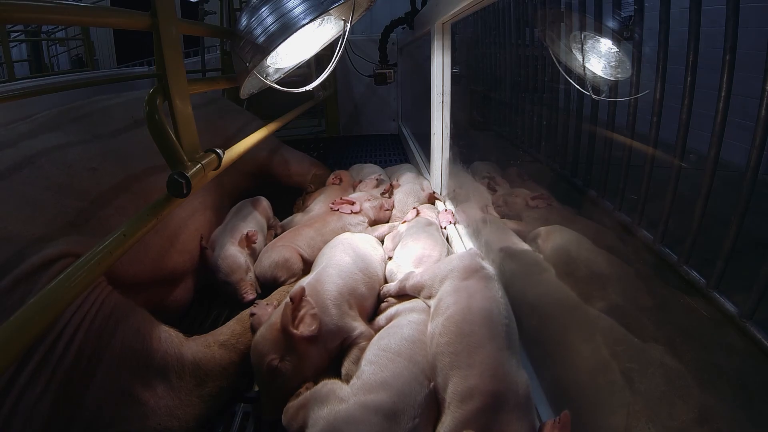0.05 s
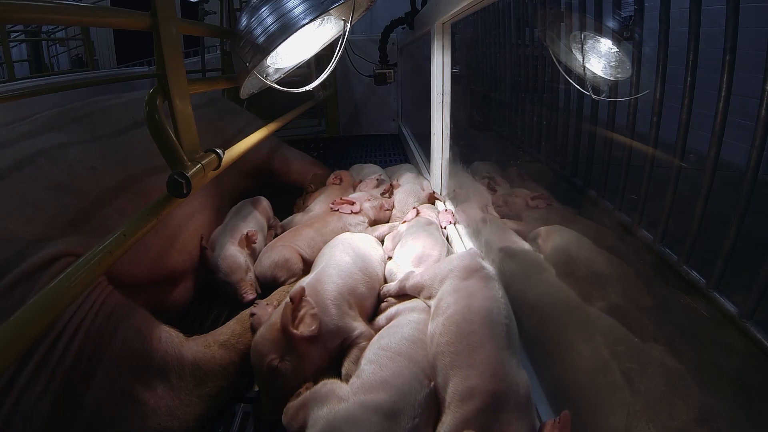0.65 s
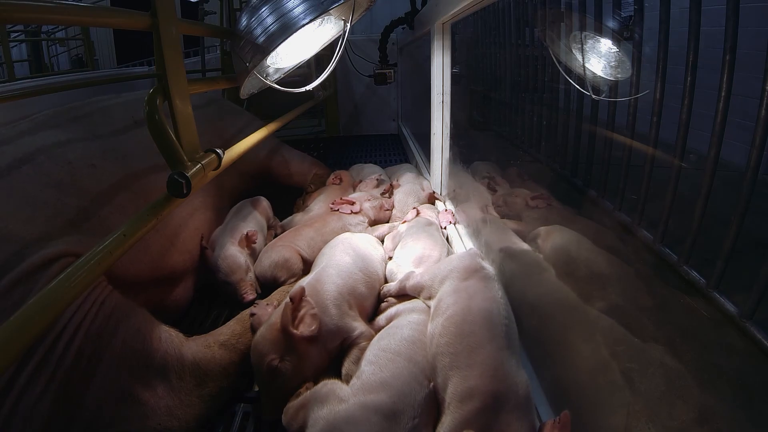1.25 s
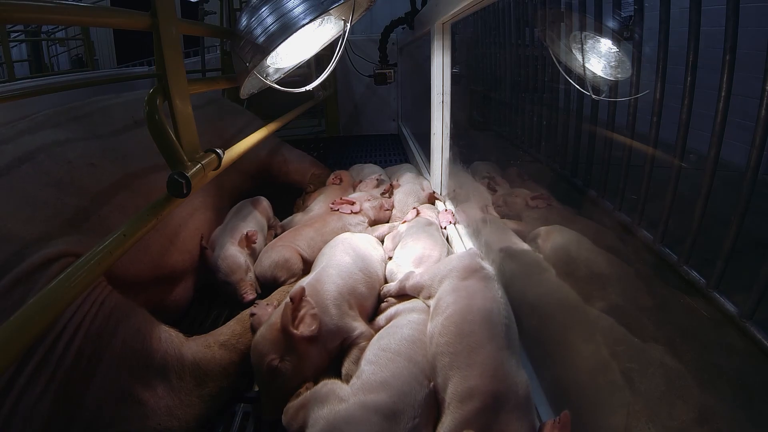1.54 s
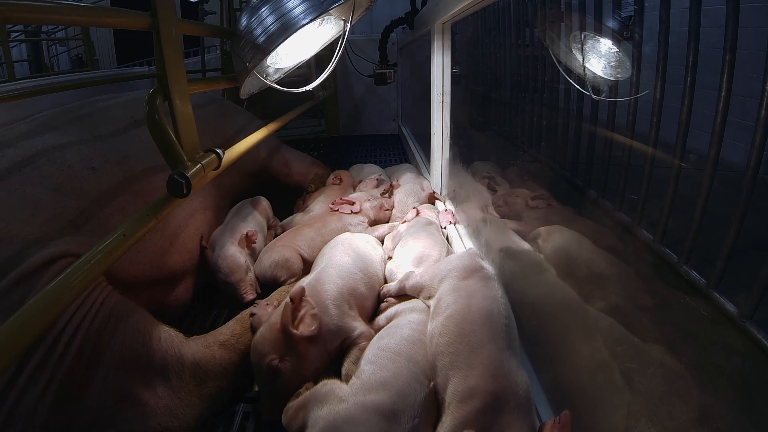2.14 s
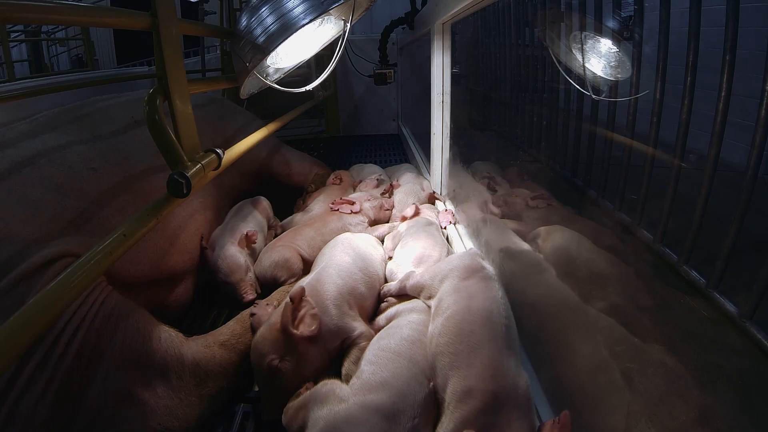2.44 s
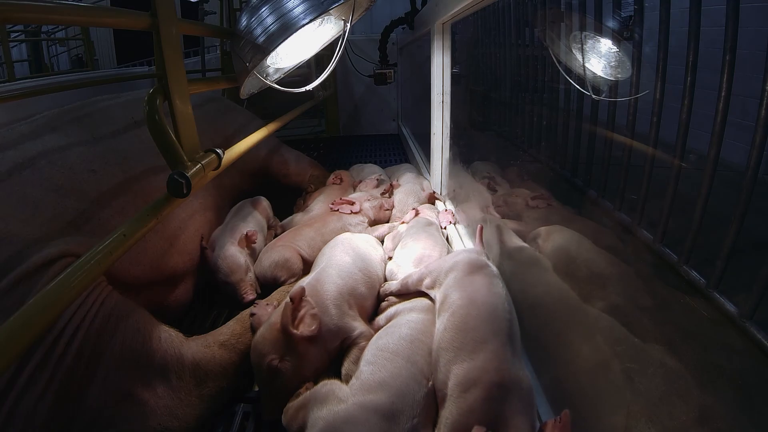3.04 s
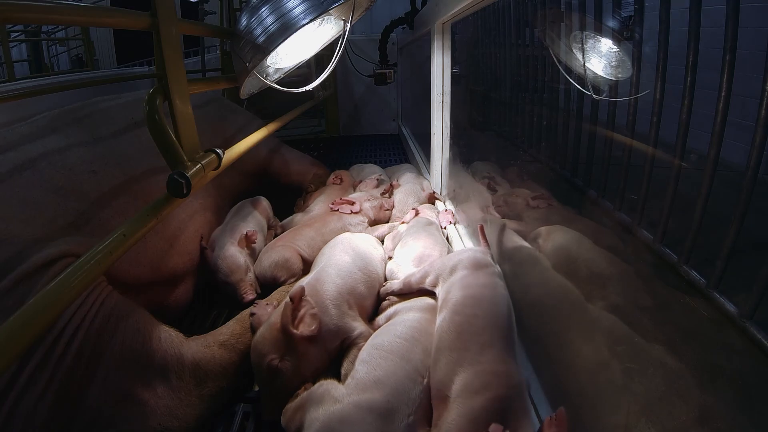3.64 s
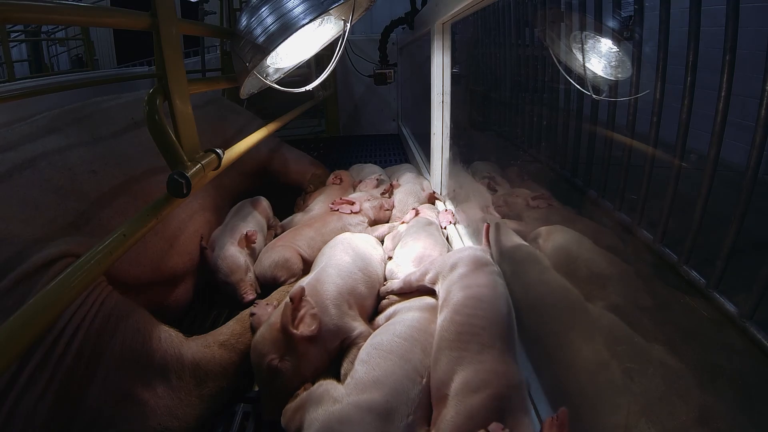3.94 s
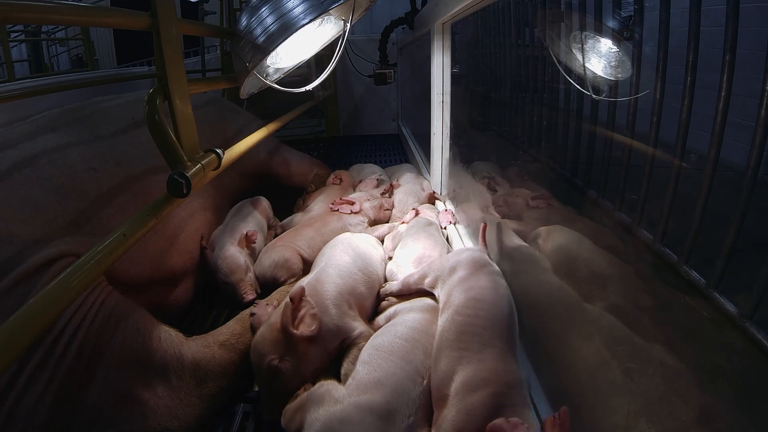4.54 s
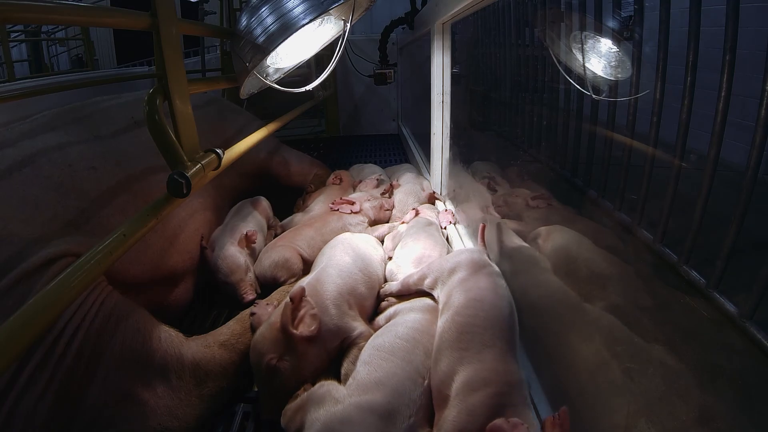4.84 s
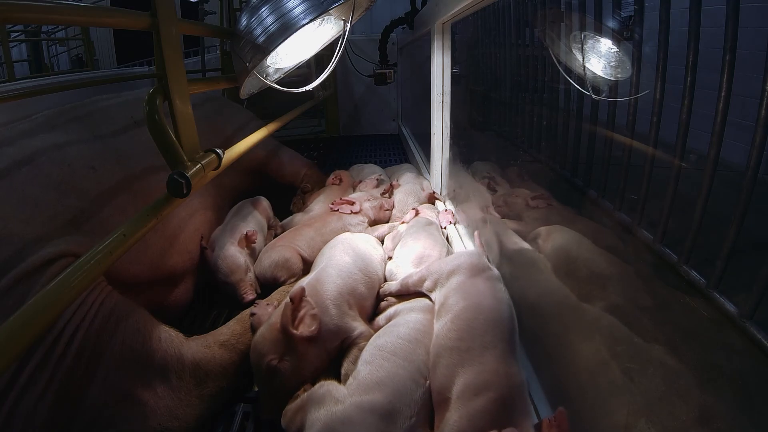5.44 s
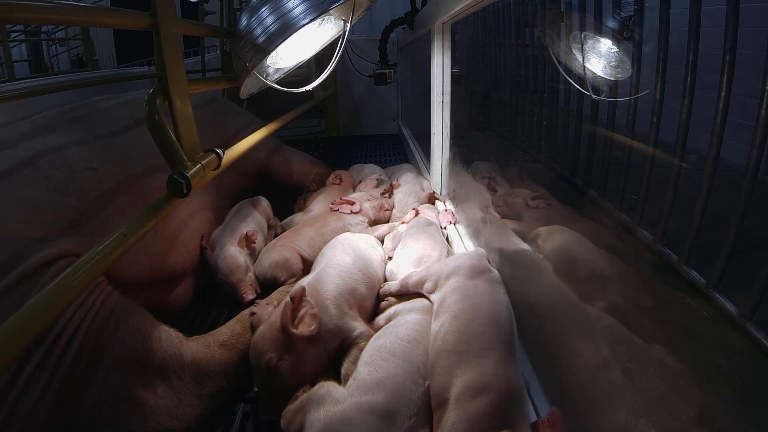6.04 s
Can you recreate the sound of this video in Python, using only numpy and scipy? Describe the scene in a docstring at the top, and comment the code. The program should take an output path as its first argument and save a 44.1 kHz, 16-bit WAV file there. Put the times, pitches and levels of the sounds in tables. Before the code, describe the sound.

Ventilation fans drone and hum in a pig barn under a thin high whine, with faint piglet rustles, squeaks and late bumps.

```python
"""Ventilation fans drone and beat over a mains hum and a rush of air: a farrowing barn at rest.
A narrow high whine, like water forced through a valve, hangs above; a thin whistle fades and returns.
Sleeping piglets rub on the floor and each other, faint squeaks carry from farther pens,
hooves click on the slats, and late bumps ring the pen."""
import sys
import numpy as np
from scipy import signal
from scipy.fft import rfft, irfft
from scipy.io import wavfile

SR = 44100
rng = np.random.default_rng(int(sys.argv[2]) if len(sys.argv) > 2 else 0)


def inscribe(sig):
    """Save sig as 16-bit PCM at rate SR to the path in sys.argv[1].

    A 1-D sig is mono; a 2-D sig holds one channel per row.
    Samples are clipped to [-1, 1] before scaling.
    """
    pcm = np.round(np.clip(np.atleast_2d(sig).T, -1, 1) * 32767)
    wavfile.write(sys.argv[1], SR, pcm.astype(np.int16))


N = 277122
TIME_S, FREQ_HZ = np.arange(N) / SR, np.fft.rfftfreq(N, 1 / SR)


def amp(db):
    """Decibels to gain."""
    return 10 ** (np.asarray(db) / 20)


def unit(x):
    """Scale to rms 1."""
    return x / np.sqrt(np.mean(abs(x) ** 2) + 1e-30)


def follow(rows):
    """Value columns of a time table, interpolated per sample."""
    times_s, *columns = np.transpose(rows)
    return [np.interp(TIME_S, times_s, column) for column in columns]


def contour(points):
    """Spectrum in dB: straight lines over log frequency, silent past the ends."""
    hz, db = np.transpose(points)
    return np.interp(np.log(FREQ_HZ + 1), np.log(hz + 1), db, left=-np.inf, right=-np.inf)


def bell(offset, width):
    """Gaussian, peak 1; full width at half height."""
    return .5 ** ((2 * offset / width) ** 2)


def noise(density_db):
    """Noise of the given power per Hz."""
    return irfft(rfft(rng.standard_normal(N)) * amp(density_db), N) * np.sqrt(SR / 2)


def band(hz, width_oct):
    """Smooth noise band, rms 1."""
    power = bell(np.log2((FREQ_HZ + 1) / hz), width_oct)
    return unit(irfft(rfft(rng.standard_normal(N)) * np.sqrt(power), N))


def waver(width_hz):
    """Complex random drift of strength and phase, rms 1."""
    size = 8192
    hz = np.fft.fftfreq(size, TIME_S[-1] / size)
    phasors = np.exp(2j * np.pi * rng.random(size))
    drift = np.fft.ifft(np.sqrt(bell(hz, width_hz)) * phasors)
    return unit(np.interp(TIME_S, np.linspace(0, TIME_S[-1], size), drift))


def sway(rms_db):
    """Slow random gain."""
    return amp(rms_db * unit(waver(width_hz=5).real))


def tone(hz, scatter, width_hz):
    """Tone, rms about 1; moving room air scatters a share of its power."""
    turns = np.cumsum(hz * np.ones(N)) / SR + rng.random()
    envelope = np.sqrt(1 - scatter) + np.sqrt(scatter) * waver(width_hz)
    return np.sqrt(2) * (envelope * np.exp(2j * np.pi * turns)).real


def arch(start_s, length_s):
    """Envelope: rounded rise and fall."""
    progress = np.clip((TIME_S - start_s) / length_s, 0, 1)
    return np.sqrt(abs(np.sin(np.pi * progress)))


def blow(start_s, rise_s, t60_s):
    """Envelope: quick rise, exponential decay."""
    age_s = np.maximum(TIME_S - start_s, 0)
    return amp(-60 * age_s / t60_s) * (1 - np.exp(-age_s / rise_s))


def fan_throb(trim_db=-2.4):
    """Low note of the big fans, throbbing as they drift in and out of step."""
    # beat envelope: (time [s], level before trim [dB])
    throb = [(0.0, -48.5), (0.44, -37), (0.77, -57), (0.91, -35.5), (1.15, -36.5), (1.45, -47),
             (1.64, -38.5), (1.94, -51), (2.55, -32), (2.6, -46), (3.06, -53), (3.15, -35.5), (3.62, -44),
             (3.99, -36.5), (4.18, -61), (4.23, -41.5), (6.14, -36.5), (6.28, -39)]
    throb_db, = follow(throb)
    return amp(throb_db + trim_db) * sway(rms_db=2) * tone(hz=57.3, scatter=0.034, width_hz=6.6)


def hum():
    """Gently wavering mains hum plus steady machine tones."""
    # mains, motors, housings: (frequency [Hz], level [dB], scatter [0-1], scatter width [Hz])
    tones = [(60.0, -54, .05, 2), (213, -63.5, .8, 6), (248, -58, .6, 6), (301.5, -64, .7, 4),
             (318.7, -53, .02, 3), (516.4, -72, .3, 2), (602.3, -71.5, .3, 3), (625.8, -71.5, .3, 3),
             (678.7, -74.5, .6, 3), (688.4, -73.5, .4, 2), (719.8, -76.5, .3, 2), (731.4, -70.5, .3, 3),
             (986.4, -73, .7, 5), (993.6, -72.5, .6, 5), (1252.5, -66, .5, 5), (1329, -70.5, .8, 8),
             (1669, -74.5, .8, 6), (2114.5, -76.5, .4, 4), (4834, -80, .7, 10), (5531, -73.5, .6, 8),
             (5722, -74, .8, 16), (9351, -95, .4, 5), (9411, -97, .7, 8), (9830, -98, .4, 5)]
    mains = amp(-51) * tone(hz=180, scatter=0.05, width_hz=2.3)
    return mains + sum(amp(db) * tone(hz, scatter, width_hz) for hz, db, scatter, width_hz in tones)


def duct_rumble():
    """Turbulence in the fan ducts."""
    # rumble spectrum: (frequency [Hz], density [dB/Hz])
    spectrum = [(8, -91), (20, -68), (34, -57.5), (48, -61.5), (58, -57.5), (72, -61.5), (92, -59.5),
                (115, -63), (140, -67), (178, -68.5), (215, -71.5), (275, -74.5), (345, -76.5),
                (440, -86.5), (700, -108)]
    return noise(contour(spectrum))


def air_rush():
    """Air rushing through the room, coloured by ducts and fittings."""
    # air spectrum: (frequency [Hz], density before lift [dB/Hz])
    spectrum = [(200, -101), (450, -87.5), (720, -85.5), (830, -88), (1050, -84.5), (1800, -88.5),
                (2300, -93), (2650, -96), (3200, -98), (4200, -103), (6700, -112.7), (8000, -112.5),
                (11000, -113.5), (12700, -119.5), (15500, -123)]
    # duct and fitting resonances: (centre [Hz], width [Hz], lift [dB])
    resonances = [(1329, 156, 5), (1503, 260, 4), (2163, 370, 5), (9000, 1000, 3.5), (10700, 1500, 0.8)]
    lift_db = sum(db * bell(FREQ_HZ - hz, width_hz) for hz, width_hz, db in resonances)
    return sway(rms_db=0.32) * noise(contour(spectrum) + lift_db)


def whine():
    """Narrow noise peak near 5.4 kHz, swelling slightly."""
    # whine spectrum: (frequency [Hz], density before swell [dB/Hz])
    spectrum = [(4100, -121), (4550, -103), (4850, -94), (5150, -87), (5380, -83.5), (5620, -89.5),
                (5850, -91.5), (6100, -102), (6450, -113), (7000, -131)]
    # slow swell: (time [s], gain [dB])
    swell = [(0, 0), (2.8, .1), (3.05, 0), (3.95, -0.8), (4.25, 1), (5, 0.1), (6.28, 0)]
    swell_db, = follow(swell)
    return amp(swell_db) * sway(rms_db=0.2) * noise(contour(spectrum))


def whistle():
    """Thin fuzzy whistle; fades, then returns creeping up in pitch."""
    # whistle path: (time [s], pitch [Hz], level [dB])
    path = [(0, 7350, -77), (.45, 7360, -74), (.75, 7350, -78), (1.05, 7330, -101), (1.3, 7300, -115),
            (4.8, 7000, -112), (5.3, 7100, -92), (5.75, 7210, -82), (6.28, 7290, -78)]
    hz, db = follow(path)
    return amp(db) * tone(hz, scatter=0.99, width_hz=160)


def rustles():
    """Bristles and skin stick and slip in uneven grains."""
    # piglets rubbing: (start [s], length [s], centre [Hz], width [oct], level [dB])
    rubs = [(0.017, 0.27, 1310, 1, -54.5), (0.453, 0.48, 1410, 0.7, -57), (.52, 0.24, 2600, 1.1, -65),
            (1.2, 0.33, 3830, .5, -67.5), (1.2, 0.91, 10300, 0.74, -78), (1.678, 0.33, 2690, 0.67, -64),
            (2.498, 0.52, 2980, 0.66, -63.5), (2.48, 0.32, 1660, 0.76, -54.5), (3.2, .48, 1400, 0.73, -58),
            (4.9, 0.78, 8950, .6, -76), (5.866, .09, 1340, .9, -53), (5.913, 0.17, 10200, 0.52, -73)]
    out = np.zeros(N)
    for start_s, length_s, hz, width_oct, db in rubs:
        friction = band(hz, width_oct)
        grain_db = 4.1 * waver(width_hz=170).real
        out += amp(db) * arch(start_s, length_s) * unit(friction * amp(grain_db))
    return out


def squeaks():
    """Short gliding calls from farther pens, smeared by the barn."""
    # calls: (start [s], length [s], start pitch [Hz], end pitch [Hz], level [dB])
    calls = [(0.529, 0.062, 2000, 2150, -56), (1.662, 0.15, 915, 930, -58.5), (3.091, .12, 900, 747, -61),
             (3.172, 0.12, 8650, 8700, -74), (3.222, 0.059, 2100, 1950, -57),
             (3.277, 0.32, 1590, 1506, -59), (3.553, 0.11, 1580, 1553, -53)]
    out = np.zeros(N)
    for start_s, length_s, start_hz, end_hz, db in calls:
        glide_hz = np.interp(TIME_S, [start_s, start_s + length_s], [start_hz, end_hz])
        out += amp(db) * arch(start_s, length_s) * tone(glide_hz, scatter=0.73, width_hz=0.04 * start_hz)
    return out


def hoof_ticks(rise_s=0.0028):
    """Hooves on the slats: light high clicks, no body."""
    # clicks: (start [s], centre [Hz], width [oct], level [dB], t60 [s])
    clicks = [(1.379, 8400, .35, -51, 0.038), (3.857, 10500, .45, -62, 0.06),
              (5.938, 9800, .42, -55.5, 0.094)]
    return sum(amp(db) * blow(start_s, rise_s, t60_s) * band(hz, width_oct)
               for start_s, hz, width_oct, db, t60_s in clicks)


def pen_knocks(rise_s=0.0039):
    """Bodies and hooves bump the pen; each bump rings the same broad modes with its own tilt."""
    # bumps: (start [s], base level [dB], tilt [dB/oct], t60 [s])
    bumps = [(5.222, -38.5, -0.2, 0.14), (5.712, -45, 3.5, 0.079), (6.054, -49, 5, 0.15)]
    # pen modes, lowest first: (centre [Hz], width [oct], gain [dB])
    modes = [(303, 0.53, 2.5), (655, 0.31, -3.5), (1380, 0.65, -5)]
    lowest_hz = modes[0][0]
    out = np.zeros(N)
    for start_s, base_db, tilt_db_per_oct, t60_s in bumps:
        for hz, width_oct, mode_db in modes:
            db = base_db + mode_db + tilt_db_per_oct * np.log2(hz / lowest_hz)
            out += amp(db) * blow(start_s, rise_s, t60_s) * band(hz, width_oct)
    return out


def scene():
    """Mono mix at one microphone over the pen."""
    background = fan_throb() + hum() + duct_rumble() + air_rush() + whine() + whistle()
    piglets = rustles() + squeaks() + hoof_ticks() + pen_knocks()
    return (background + piglets)[None]


def record(dry):
    """Steep low-pass band limit."""
    cutoff_hz = 15300
    lowpass = signal.firwin(1023, cutoff_hz, window=("kaiser", 9), fs=SR)
    return signal.oaconvolve(dry, lowpass[None], "same")


dry = scene()
out = record(dry)
inscribe(out)
```